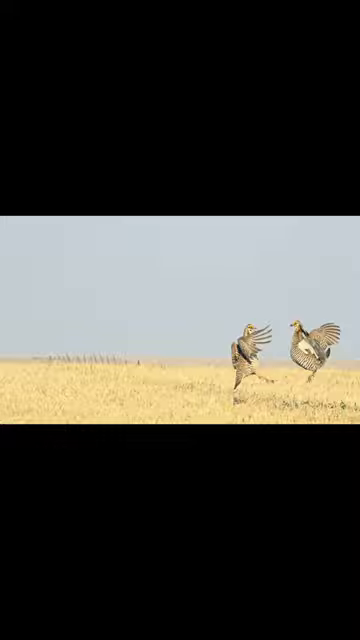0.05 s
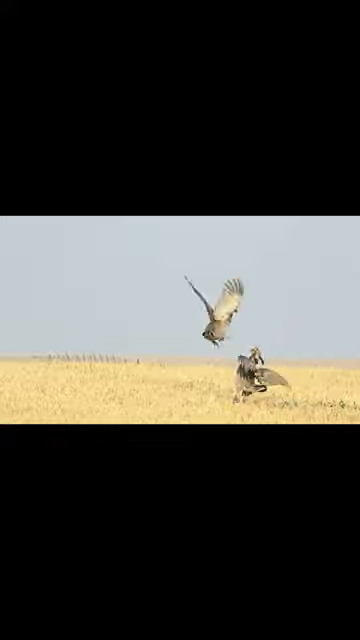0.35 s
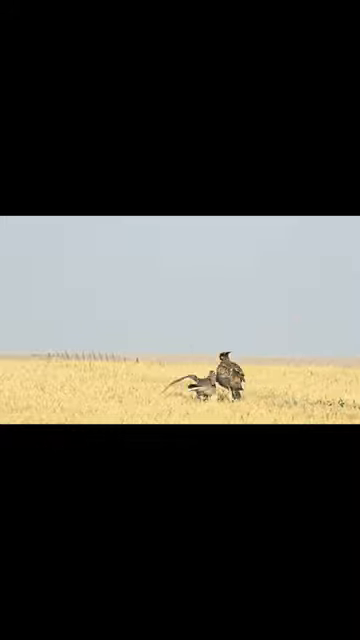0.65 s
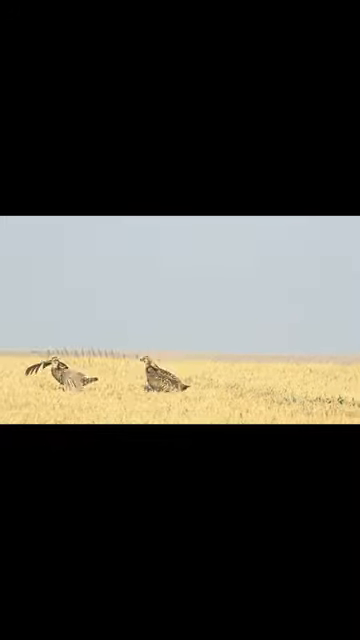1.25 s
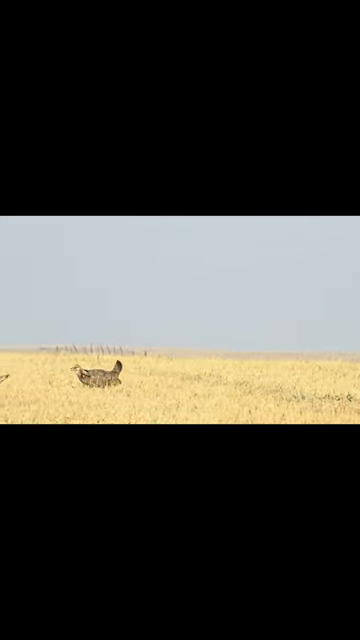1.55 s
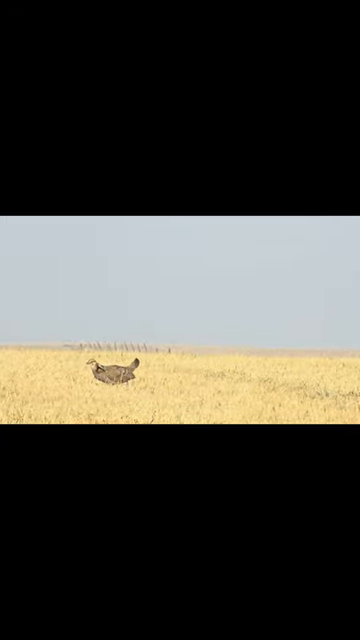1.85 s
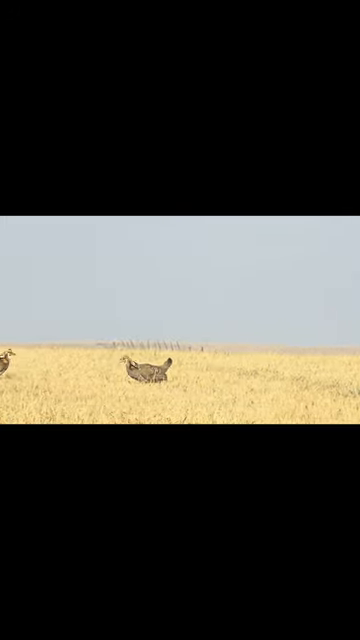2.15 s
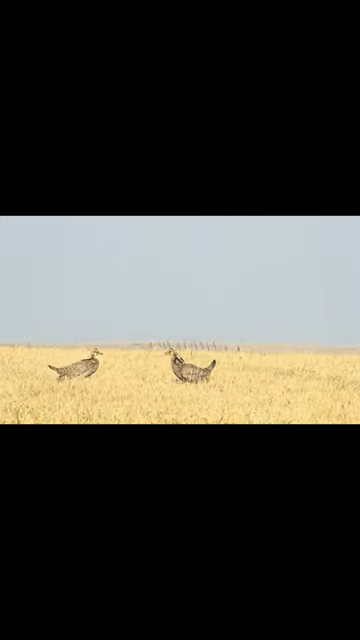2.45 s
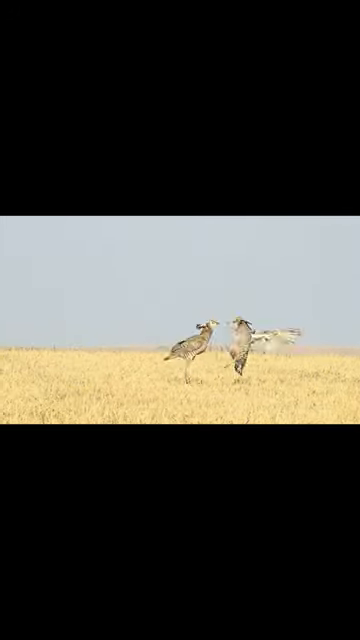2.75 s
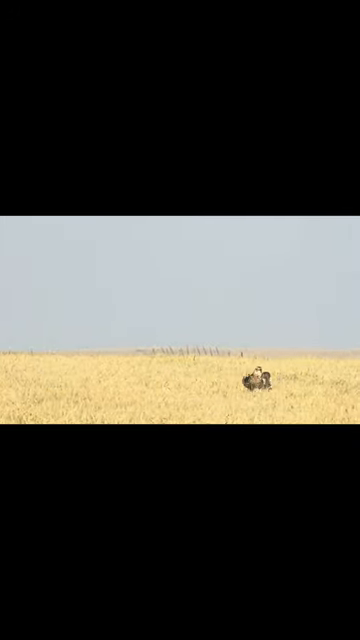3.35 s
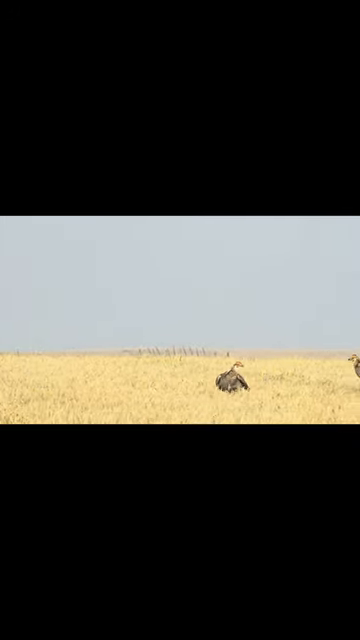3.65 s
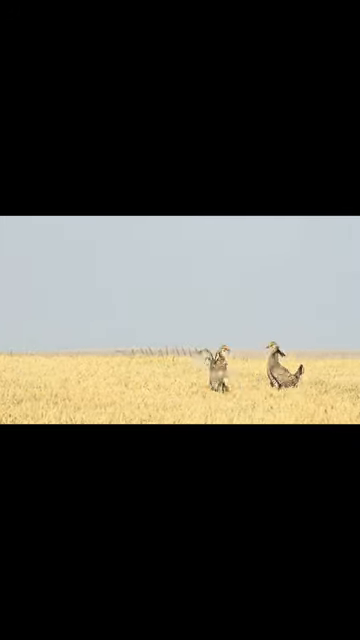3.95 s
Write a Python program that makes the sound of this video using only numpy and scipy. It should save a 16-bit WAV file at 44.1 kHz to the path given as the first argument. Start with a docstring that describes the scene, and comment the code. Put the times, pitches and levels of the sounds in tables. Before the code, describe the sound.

Two birds fight some way off in an open field, wings flapping and slapping as dry grass rustles and snaps. Harsh squawks come at the start and again past the middle. Wind rumbles on the microphone over a thin hiss.

```python
"""Two prairie chickens fight on an open field, some way off. From the start, wind rumbles and buffets
the microphone over a thin hiss. At once dry grass rustles and snaps under the birds, harsh squawks
rise and fall in their throats, and a wing slaps. Puffs of air from wings and gusts follow.
The middle is mostly slaps and rustling, with one faint call. After two seconds the squawks return;
the last second has only wings, grass, wind and hiss."""
import sys
import numpy as np
from scipy import signal
from scipy.fft import rfft, irfft, next_fast_len
from scipy.io import wavfile
from scipy.ndimage import map_coordinates

SR = 44100
rng = np.random.default_rng(int(sys.argv[2]) if len(sys.argv) > 2 else 0)


def bounce(signal):
    """Save signal as a 16-bit WAV file at the path given by the first command-line argument."""
    frames = np.transpose(np.atleast_2d(signal))
    limited = np.clip(frames, -1, 1)
    pcm = np.round(limited * 32767).astype(np.int16)
    wavfile.write(sys.argv[1], SR, pcm)


N = 176400
TIME = np.arange(N) / SR


def amp(db):
    """Turn decibels into a gain."""
    return 10 ** (np.asarray(db) / 20)


def unit(x):
    """Scale a signal to an average power of 1."""
    return x / np.sqrt(np.mean(x ** 2) + 1e-30)


def along(points, hz):
    """Read a table of (frequency, value) points on a log frequency axis."""
    freqs, values = np.transpose(points)
    return np.interp(np.log(hz + 1), np.log(freqs + 1), values)


def curves(rows):
    """One value per sample for each column after the time."""
    times, *columns = np.transpose(rows)
    return [np.interp(TIME, times, column) for column in columns]


def wobble(rate):
    """A smooth random curve through `rate` points a second."""
    return map_coordinates(rng.standard_normal(int(N * rate / SR) + 4), [TIME * rate])


def filtered(x, response):
    """Multiply each frequency in x by response(hz)."""
    size = next_fast_len(N + 8192)
    return irfft(rfft(x, size) * response(np.fft.rfftfreq(size, 1 / SR)), size)[..., :N]


def pan(side_db):
    """Left and right gains of constant power; a positive side is to the left."""
    gains = amp(np.array([[.5], [-.5]]) * side_db)
    return gains / np.sqrt(np.mean(gains ** 2, axis=0))


def noise(spectrum, width_db):
    """Stereo noise of power 1; the spectrum sets only its tone colour."""
    mid, side = filtered(rng.standard_normal((2, N)), lambda hz: amp(along(spectrum, hz)))
    return unit(np.array([mid + amp(width_db) * side, mid - amp(width_db) * side]))


def fade(x):
    """Fall from 1 to almost nothing as x grows."""
    return np.exp(-np.minimum(x, 20))


def burst(start, rise_s, decay_s):
    """A loudness shape that jumps up and dies away."""
    t = np.maximum(TIME - start, 0)
    return (1 - np.exp(-t / rise_s)) * fade(t / decay_s)


def lag(pair, lag_s):
    """The sound reaches the left side first."""
    return filtered(pair, lambda hz: np.exp(np.array([[1j], [-1j]]) * np.pi * hz * lag_s))


# How the three parts of the wind swell and sink: t/s, relative level/dB
RUMBLE_LEVEL = [(0, -50.5), (.3, -61.5), (.42, -47), (.55, -57), (.72, -46.5), (1.1, -51), (1.95, -56),
                (2.2, -51), (2.4, -57), (2.55, -52.5), (2.8, -54), (2.94, -63.5), (3.05, -48), (3.3, -55.5),
                (3.7, -49.5), (4, -57)]
BUFFET_LEVEL = [(0.0, -73.5), (0.4, -78), (0.56, -67.5), (0.87, -67), (1.08, -74.5), (1.53, -68.5),
                (1.89, -88.5), (2.24, -69), (2.42, -63), (2.85, -70), (3.56, -66), (4.0, -60.5)]
SWISH_LEVEL = [(0, -77.5), (.25, -80), (.45, -89.5), (1.25, -87.5), (1.5, -81), (1.62, -77), (1.73, -82.5),
               (1.82, -79), (1.9, -84), (2.05, -77.5), (2.33, -76), (2.5, -88), (2.67, -78), (2.85, -87),
               (2.97, -91), (3.78, -92.5), (3.89, -76.5), (4, -77.5)]
# Their tone colours: f/Hz, relative level/dB
RUMBLE_SPECTRUM = [(12, -31.5), (22, -10), (58, 2), (110, -5.5), (150, -16), (400, -50.5), (1000, -100)]
BUFFET_SPECTRUM = [(60, -18), (130, 0), (240, -2), (330, -13), (500, -19.5), (900, -39), (2500, -61)]
SWISH_SPECTRUM = [(150, 3.5), (370, 12.5), (550, 8.5), (1000, 1.5), (1900, -1), (3000, -11), (7000, -25.5)]

def wind():
    """Wind rumbles, buffets each side of the microphone in lumps, and swishes over the field."""
    (rumble_db,), (buffet_db,), (swish_db,) = map(curves, (RUMBLE_LEVEL, BUFFET_LEVEL, SWISH_LEVEL))
    rumble = amp(rumble_db + 3.23 * wobble(28.137)) * noise(RUMBLE_SPECTRUM, width_db=-15)
    lumps = amp(3.06 * np.array([wobble(35), wobble(35)]))
    buffet = amp(buffet_db + 1) * lumps * noise(BUFFET_SPECTRUM, width_db=-3.5)
    swish = amp(swish_db + 2.5 + 2.2 * wobble(90)) * noise(SWISH_SPECTRUM, width_db=-16)
    return rumble * pan(side_db=0.5) + buffet * pan(side_db=-2) + lag(swish, lag_s=0.00011)


# How the hiss changes: t/s, relative level/dB, side/dB
HISS_LEVEL = [(0.0, -76.5, -11), (0.57, -83, -6), (0.6, -83.5, 5), (0.92, -80.5, 0.5), (2.97, -85.5, 2),
              (4.0, -89, 7)]
# Its tone colour, also the bright edge of the grass: f/Hz, relative level/dB
HISS_SPECTRUM = [(1500, -31), (4000, -18), (6800, -9.5), (8200, 1.5), (10500, -11), (11600, 7.5),
                 (13000, 4.5), (15500, 5)]

def hiss():
    """A thin high hiss that wavers, weakens and drifts from right to left."""
    level_db, side_db = curves(HISS_LEVEL)
    return amp(level_db + 6 + wobble(25)) * pan(side_db) * noise(HISS_SPECTRUM, width_db=1.2)


# Feathers brush through grass: t/s, relative level/dB, half length/s, side/dB
BRUSHES = [(0.061, -68, 0.036, -3.5), (0.131, -70.5, 0.026, 0), (0.23, -66.5, 0.047, -4),
           (0.362, -74, 0.041, -8), (0.544, -68.5, 0.0079, -7), (0.722, -84.5, 0.081, 2),
           (0.965, -76, 0.029, -2), (1.05, -70, 0.048, -13), (1.474, -76, 0.06, -11),
           (1.58, -75.5, 0.037, 7), (2.055, -78, 0.069, 6), (2.272, -80.5, 0.12, 2),
           (2.532, -80, 0.029, -8), (2.678, -73.5, 0.055, 2.5), (2.785, -67.5, 0.018, 12),
           (2.873, -73.5, 0.043, 5), (3.05, -79.5, 0.021, 2), (3.639, -84, 0.014, -4)]
# Stalks and quills snap: t/s, relative level/dB, side/dB
SNAPS = [(0.02, -52.5, -2), (0.037, -52.5, -14), (0.351, -64, 11), (0.632, -61.5, -1), (0.689, -62, 2.5),
         (0.8567, -57.5, 0), (0.979, -67, 4), (1.073, -52.5, -1), (1.567, -60, 12), (2.114, -48.5, 6),
         (2.319, -57.5, -4), (2.493, -62.5, -12), (2.578, -63, 6), (2.853, -50.5, 15), (2.987, -67.5, 12),
         (3.322, -67, 0), (3.605, -67.5, -10)]
# Tone colours of the rustle and the snaps: f/Hz, relative level/dB
RUSTLE_SPECTRUM = [(600, -21), (2000, -3), (3200, -4.5), (4300, 0), (6000, -5.5), (8500, -1), (15000, -3)]
SNAP_SPECTRUM = [(500, -79), (2000, -9), (4500, 0), (9000, 2), (15000, 4)]
SNAP_RISE_S, SNAP_DECAY_S, CRACKLES_PER_S = 0.00044, 0.002, 25

def grass():
    """Feathers and feet in dry stalks make a grainy rustle, tiny crackles and single sharp snaps."""
    strokes = sum(amp(db) * pan(side_db) * fade(((TIME - at) / half_s) ** 2)
                  for at, db, half_s, side_db in BRUSHES)
    scuffle = amp(-87) + amp(-2) * strokes  # never quite still
    grains = unit(amp(2.24 * wobble(700) + 2.22 * wobble(70)))
    rustle = scuffle * grains * noise(RUSTLE_SPECTRUM, width_db=0)
    bright_edge = amp(-1) * strokes * np.sqrt(grains) * noise(HISS_SPECTRUM, width_db=-4)
    cracks = (rng.random(N) < CRACKLES_PER_S / SR) * amp(2.5 + 3.5 * rng.standard_normal(N))
    crackle = scuffle * signal.lfilter([1], [1, -np.exp(-1 / (SNAP_DECAY_S * SR))], cracks)
    snaps = sum(amp(db + 2) * pan(side_db) * burst(at, SNAP_RISE_S, SNAP_DECAY_S)
                for at, db, side_db in SNAPS)
    return rustle + bright_edge + (snaps + crackle) * noise(SNAP_SPECTRUM, width_db=-0.5)


# The calls, timed at their highest pitch: t/s, rise/s, fall/s, top f/Hz, glide/(octaves per s),
# level/dB, roughness/(0 to 1), side/dB, beak resonance f/Hz, low resonance level/dB
SQUAWKS = [(.089, .08, .03, 486.6, 10, -68, 0.3, -1.5, 1830, 1),
           (.137, 0.026, 0.024, 582, 5.2, -70.5, 0.1, 16, 2920, -4),
           (0.152, .04, .035, 497, 13.6, -66.5, 0.43, -2.5, 1940, 6),
           (.217, 0.038, 0.048, 573, 10, -63.5, 0.54, 1, 2280, 3.5),
           (.238, .012, 0.085, 411, 11, -71, 0.4, -8, 1600, -2.5),
           (.262, 0.018, .075, 488.7, 9, -72, 0.35, 7, 2400, -6),
           (.508, .03, 0.092, 645.4, 8.6, -69.5, 0.15, 2.5, 1870, 0),
           (1.56, 0.043, 0.12, 560, 7.2, -76.5, 0.6, 1, 2150, 3),
           (2.226, .05, 0.065, 636, 10.2, -71, 0.83, 2.5, 1990, -12.5),
           (2.295, 0.042, 0.037, 522, 6, -75.5, .8, 0, 2070, -6),
           (2.648, 0.039, 0.11, 519, 12, -69.5, 0.6, 0, 2010, 6.5),
           (2.665, 0.0071, 0.052, 575, 7.7, -74, 0.1, 10, 2400, -10),
           (2.784, 0.055, 0.1, 526, 8.8, -73, 1, 1, 2200, -2),
           (2.868, .018, 0.039, 582, 9.4, -64.5, 0.37, 6, 2530, -3),
           (2.904, .007, 0.076, 640, 17, -67.5, 0.3, 1.5, 2270, 8.5)]
# How the throat colours the voice: f/Hz, relative level/dB
THROAT_SPECTRUM = [(300, -21), (750, -8.5), (1200, -6.5), (1900, 2.5), (2550, -3), (3300, -6.5), (4200, -8),
                   (5200, -20.5), (10000, -19)]
ARCH_S, JITTER, RASP_JITTER = .014, .011, 0.06  # roundness of the pitch top; random pitch shake
BEAK_DB, BEAK_WIDTH_HZ, BEAK_FOLLOWS = 8.5, 140, 0.46  # this resonance sinks with the pitch
LOW_HZ, LOW_WIDTH_HZ = 1024, 200  # the low resonance of the throat
START_DROP_DB, END_DROP_DB, DULL_DB_PER_KHZ = 10, 10.5, 5  # a call is weaker and duller at its ends
ATTACK_S, RELEASE_S, FRAY = 0.0033, 0.014, 0.06  # fray: roughness gained as a call sinks

def squawks():
    """Each call rises and falls in pitch and level, rings in throat and beak, and frays as it sinks."""
    calls = np.zeros((2, N))
    quiver, scatter, shake = wobble(170), wobble(900), wobble(260)
    harmonics = np.arange(1, 21)[:, None]
    waver_db = 5 * np.array([wobble(45) for _ in harmonics])  # each overtone wavers on its own

    def tone(hz, gains):
        """Add up the overtones of a gliding pitch."""
        cycles = np.cumsum(hz) / SR + rng.random(harmonics.shape)
        return unit(np.sum(gains * np.sin(2 * np.pi * harmonics * cycles), axis=0))

    for at, rise, fall, top_hz, glide, db, rough, side_db, beak_hz, low_peak_db in SQUAWKS:
        span = np.flatnonzero((TIME > at - rise) & (TIME < at + fall))
        t = span / SR - at
        before, after = np.maximum(-t / rise, 0), np.maximum(t / fall, 0)  # 0 at the top, 1 at the ends
        octaves_down = glide * (np.hypot(t, ARCH_S) - ARCH_S)
        hz = top_hz * 2 ** -octaves_down * (1 + JITTER * quiver[span])
        overtone_hz = harmonics * hz

        ring_hz = beak_hz * (hz / top_hz) ** BEAK_FOLLOWS
        beak_db = BEAK_DB / (1 + ((overtone_hz - ring_hz) / BEAK_WIDTH_HZ) ** 2)
        low_db = low_peak_db / (1 + ((overtone_hz - LOW_HZ) / LOW_WIDTH_HZ) ** 4)
        dull_db = DULL_DB_PER_KHZ * (before + after) ** 2 * np.maximum(overtone_hz - beak_hz, 0) / 1000
        gains = amp(along(THROAT_SPECTRUM, overtone_hz) + beak_db + low_db - dull_db + waver_db[:, span])
        gains /= np.linalg.norm(gains, axis=0)

        rasp_share = np.clip(rough + FRAY * after ** 2, 0, 1)
        rasp = unit(tone(hz * (1 + RASP_JITTER * scatter[span]), gains) * amp(3.1 * shake[span]))
        voice = np.sqrt(1 - rasp_share) * tone(hz, gains) + np.sqrt(rasp_share) * rasp
        soft_ends = np.clip((t + rise) / ATTACK_S, 0, 1) * np.clip((fall - t) / RELEASE_S, 0, 1)
        swell = amp(db - START_DROP_DB * before - END_DROP_DB * after ** 2)
        calls[:, span] += swell * soft_ends * pan(side_db) * voice
    return lag(calls, lag_s=0.00017)


# Wing slaps: t/s, relative level/dB, decay/s, side/dB
SLAPS = [(0.11, -56.5, .007, -8), (0.432, -65, 0.012, 7), (0.858, -64, 0.01, 4), (1.326, -63, 0.019, -6),
         (1.559, -63.5, 0.0048, -10), (1.609, -56.5, 0.009, -10), (1.938, -57.5, 0.0034, -4),
         (1.971, -59.5, 0.0063, -8), (2.004, -59.5, 0.009, -10), (2.615, -64.5, 0.026, -5.5),
         (2.852, -58.5, .007, -9), (3.297, -70, 0.0053, 12), (3.433, -71, 0.005, 4),
         (3.665, -66.5, 0.004, 9), (3.915, -65, 0.016, -12)]
# Their dull tone colour: f/Hz, relative level/dB
SLAP_SPECTRUM = [(60, -9), (230, 11.5), (500, -3), (1100, -12.5), (4000, -37), (12000, -78)]

def wing_slaps():
    """Wings strike a body or the ground: short dull bursts."""
    hits = sum(amp(db + 6.5) * pan(side_db) * burst(at, rise_s=.0004, decay_s=decay_s)
               for at, db, decay_s, side_db in SLAPS)
    return lag(hits * noise(SLAP_SPECTRUM, width_db=-18), lag_s=0.00022)


# Air from wings and gusts hits the microphone: t/s, relative level/dB, f/Hz, side/dB
PUFFS = [(0.379, -35.5, 61, 8), (.443, -29, 99, 9), (0.644, -41, 70, 2), (0.736, -34, 90, 14),
         (0.861, -37, 100, 15), (.99, -38.5, 70.4, 5), (1.51, -42.5, 174, 19), (1.617, -39, 84, 3.5),
         (1.81, -44, 81, 0), (2.124, -39, 58, -1), (2.183, -39, 67.4, 3), (2.854, -46, 212, -13),
         (3.001, -36.5, 80.4, 13), (3.089, -36, 75.6, 10), (3.123, -35.5, 110, 14), (3.297, -42, 181, 34),
         (3.437, -37, 94, 12.5), (3.645, -38, 100, 8), (3.668, -37.5, 130, 19), (3.724, -38.5, 77.4, 14)]
# Tone colour of the swirling air: f/Hz, relative level/dB
FLUTTER_SPECTRUM = [(40, 1.5), (250, 3.5), (400, -19.5), (800, -35), (4000, -85)]
PUFF_CYCLES, FLUTTER_DB, FLUTTER_S = 0.39, -16, 0.017

def air_puffs():
    """Each puff is one low swing of pressure with a flutter of swirling air around it."""
    push, swirl = np.zeros((2, N)), np.zeros((2, N))
    for at, db, hz, side_db in PUFFS:
        t, gain = TIME - at, amp(db) * pan(side_db)
        push += gain * fade((t * hz / PUFF_CYCLES) ** 2) * np.sin(-2 * np.pi * hz * t)
        swirl += gain * fade(np.abs(t) / FLUTTER_S)
    return push + amp(FLUTTER_DB) * swirl * noise(FLUTTER_SPECTRUM, width_db=-3)


def ground_echo(x, level_db=-2.5, die_away_s=0.062):
    """The stubble scatters sound into a short, blurred tail."""
    t = np.arange(SR // 3) / SR
    tail = rng.standard_normal((2, len(t))) * amp(-60 * t / die_away_s)
    return amp(level_db) * signal.fftconvolve(x, tail / np.linalg.norm(tail[0]), axes=1)[:, :N]


def scene():
    """Add up all the sounds; only the calls and slaps echo."""
    birds = squawks() + wing_slaps()
    return birds + ground_echo(birds) + grass() + air_puffs() + wind() + hiss()


def record(dry, top_hz=15850):
    """Cut away the very highest treble."""
    return filtered(dry, lambda hz: hz < top_hz)


dry = scene()
out = record(dry)
bounce(out)
```